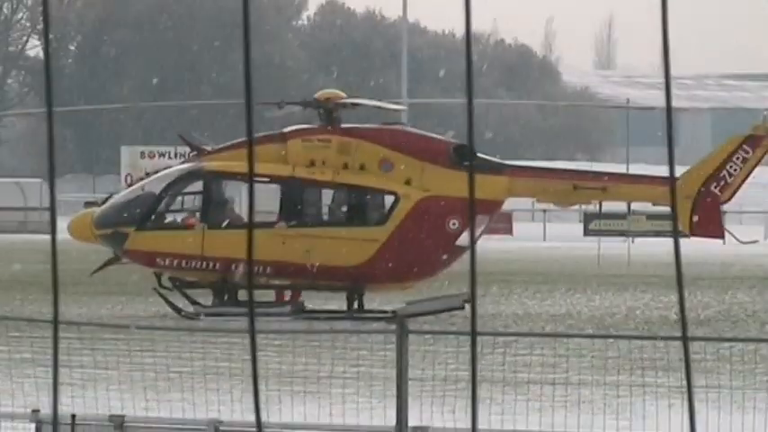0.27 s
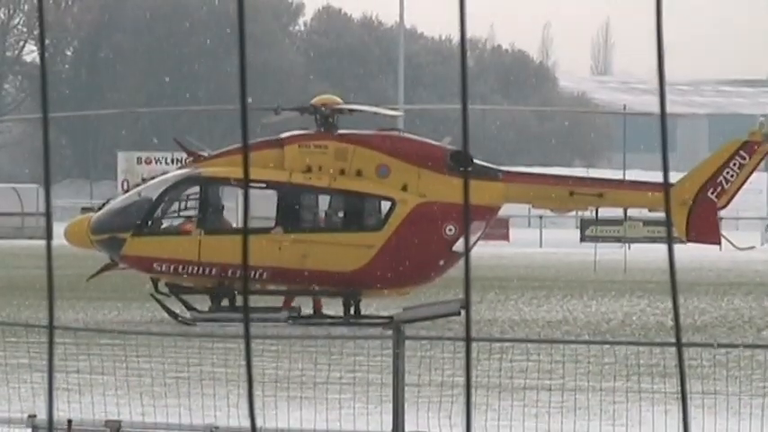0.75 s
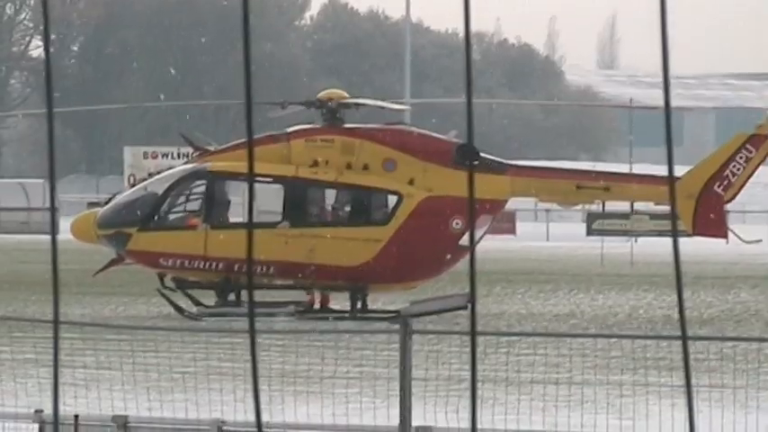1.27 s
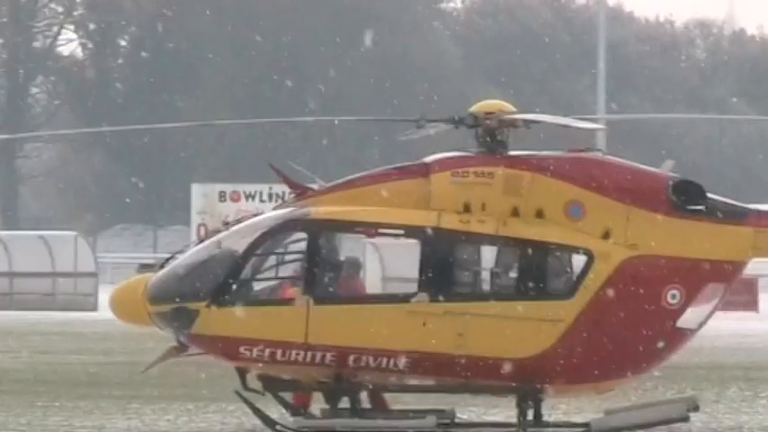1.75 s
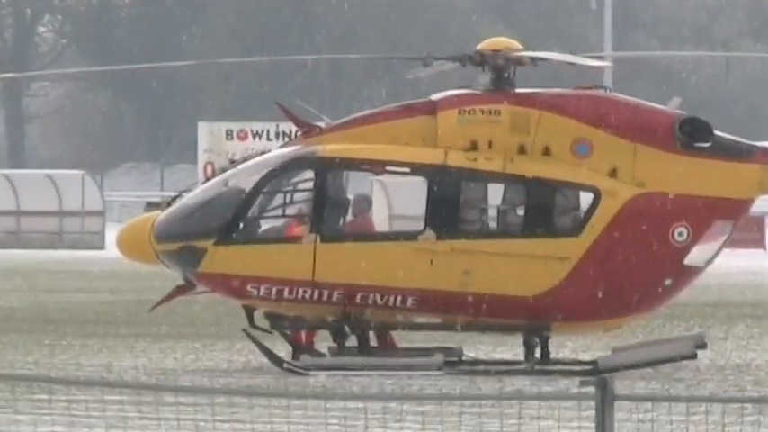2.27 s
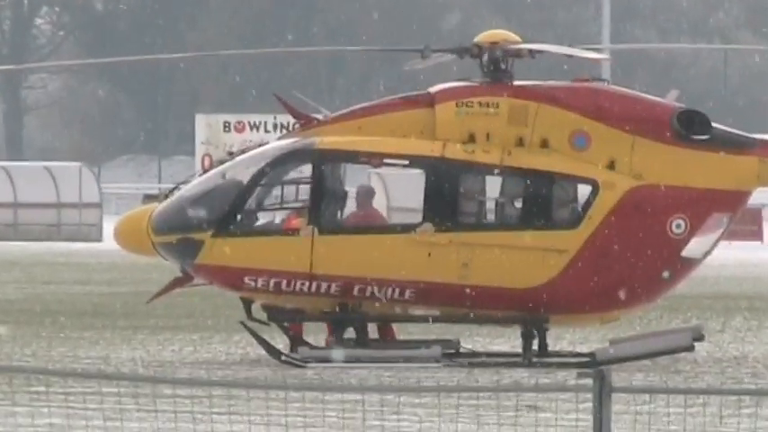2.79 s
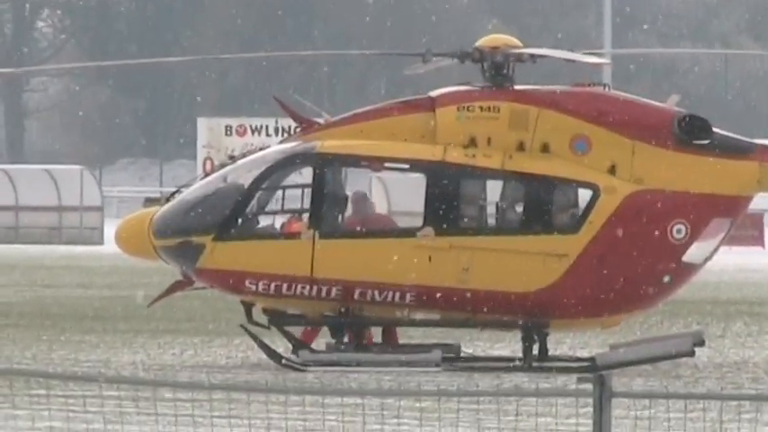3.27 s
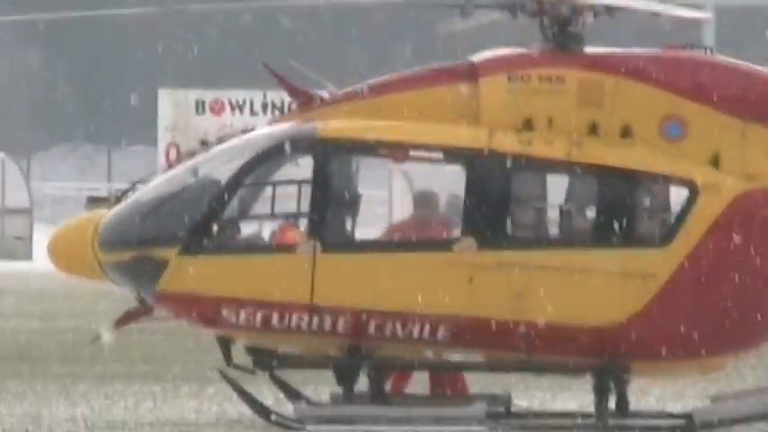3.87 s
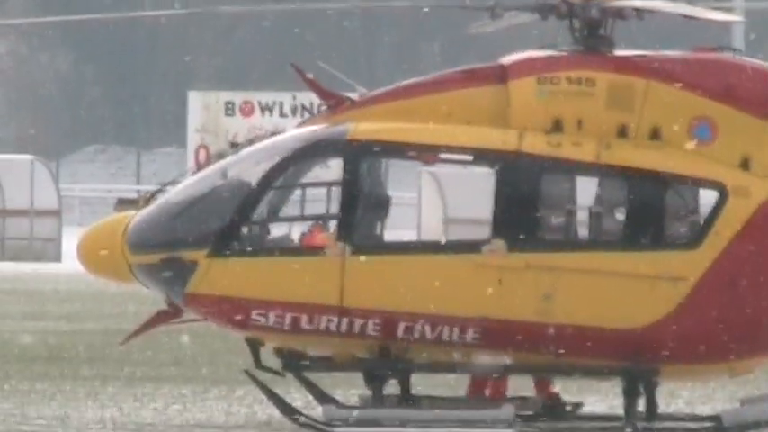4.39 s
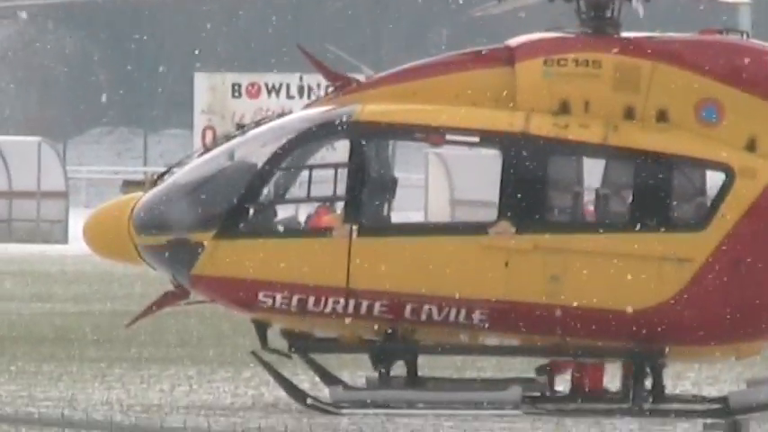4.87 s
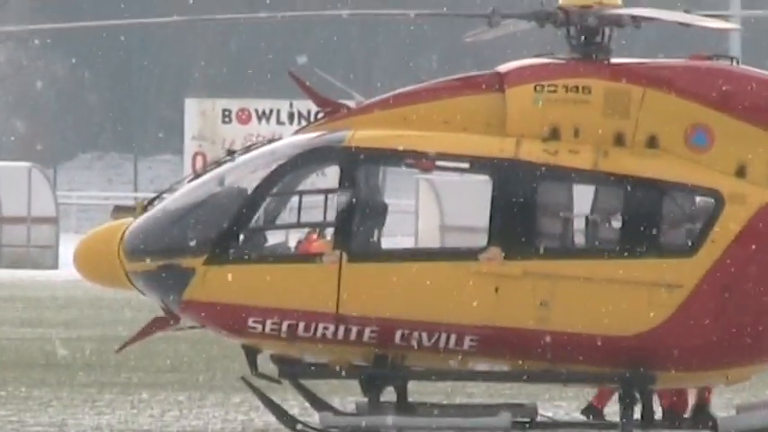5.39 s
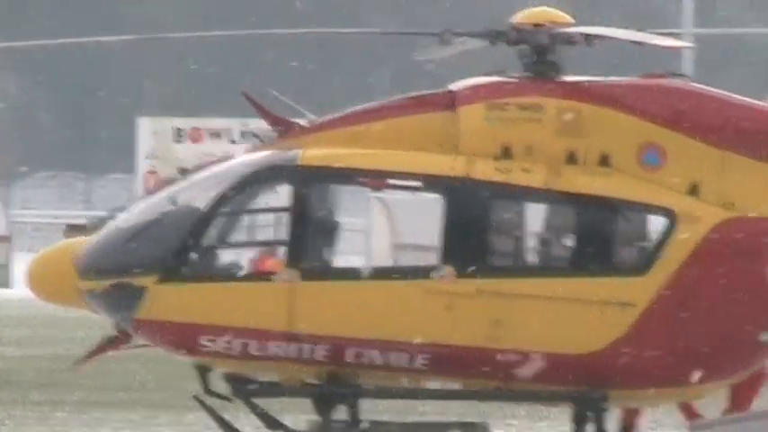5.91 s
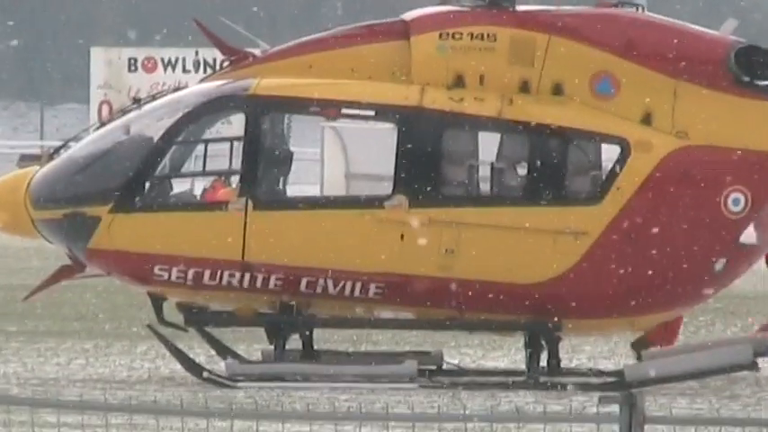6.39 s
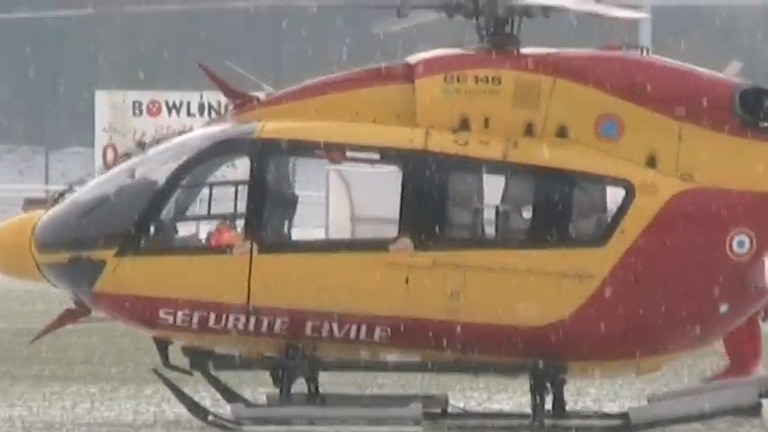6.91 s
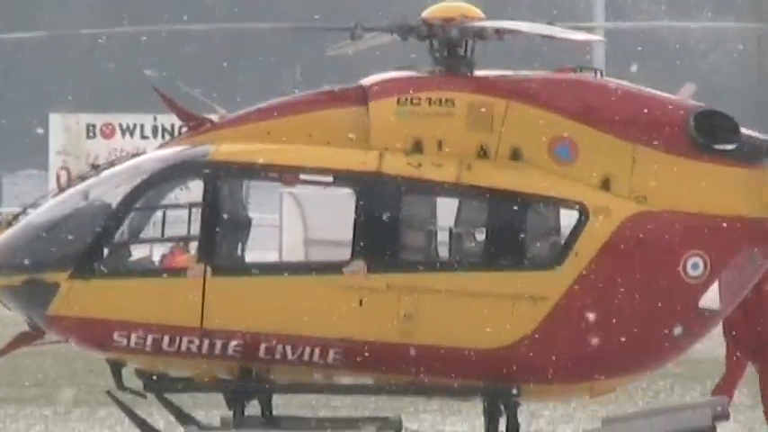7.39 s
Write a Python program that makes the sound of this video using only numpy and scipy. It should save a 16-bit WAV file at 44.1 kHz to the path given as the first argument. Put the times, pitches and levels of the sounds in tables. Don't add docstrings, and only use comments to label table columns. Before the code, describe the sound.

Close turbine noise from a standing helicopter: dense high whines, rushing hiss and a swelling low drone. A sharp cut then drops the drone, leaving steady hiss, low hum and a hard whine that waxes and wanes, with a fine motor buzz from the camera. Wind puffs bump the microphone, strongest near six seconds, and fingers click on its housing. Open field, handheld stereo.

```python
import sys
import numpy as np
from scipy import signal
from scipy.fft import rfft, irfft, next_fast_len
from scipy.io import wavfile
from scipy.ndimage import uniform_filter1d

SR = 44100
rng = np.random.default_rng(int(sys.argv[2]) if len(sys.argv) > 2 else 0)


def dump(signal):
    limited = np.clip(np.atleast_2d(signal).T, -1, 1)
    pcm = np.round(limited * 32767).astype(np.int16)
    wavfile.write(sys.argv[1], SR, pcm)


def invert_db(x):
    u = np.asarray(x, float) / 20
    return 10 ** u


N = 337365
JUMP_S = 1.7425


def walk(rate, n):
    knots = uniform_filter1d(rng.standard_normal(int(n / SR * rate * 4) + 8), size=4) * 2
    return np.interp(np.linspace(0, len(knots) - 1, n), np.arange(len(knots)), knots)


def column(table, k, hz):
    rows = np.array(table)
    return np.interp(np.log(hz), np.log(rows[:, 0]), rows[:, k])


def curve(table, t):
    s, db = np.transpose(table)
    return np.interp(t, s, db)


def tone(phase, db, right_db, lead, sway_db, rate):
    gain = np.sqrt(2) * invert_db(db + sway_db * walk(rate, len(phase)))
    left = np.cos(phase)
    right = invert_db(right_db) * np.cos(phase + lead)
    return gain * np.array([left, right])


def thicket(hz, lines, width_hz, trim_db):
    gain = np.ones(len(hz))
    for centre, over_db in lines:
        near = slice(*np.searchsorted(hz, [centre - 40, centre + 40]))
        shape = 1 / (1 + ((hz[near] - centre) / width_hz) ** 2)
        gain[near] += invert_db(min(over_db, 17) + trim_db) * shape
    return gain


# frequency in Hz, left level in dB per Hz, right minus left in dB,
# likeness of the ports from 0 to 1, right lead in rad.
HISS_AT_ENGINE = [(28, -77, -3, 1, -3.5), (55, -65, 3, 0.44, -3), (98, -61, 6.5, 0.6, 2.7),
                  (194, -66.5, 3, 0, 2), (347, -68.5, -1, 0.63, -2.1), (1340, -71.5, 0, 0.84, 0.3),
                  (2070, -73, 0.5, 1, -1.1), (3960, -76.5, 6.5, 0.99, 0.37), (5130, -83.5, -1, 0.4, -0.6),
                  (6050, -71, -1, 0.8, 4), (6580, -92, 2, 0, 3), (8900, -84, -0.5, 0.78, 4),
                  (11200, -99, 6.5, 0.66, 3.5), (13900, -114, -4, 0.5, 5)]
HISS_FARTHER = [(28, -73.5, -3, 0.62, -1), (54.6, -69, 1, 0.35, -2), (110, -66.5, 4.5, 0.4, -3),
                (254, -66, -1.5, 0.3, -2), (460, -74, 0, 0.57, 0.85), (2030, -82.5, 0, 0.67, -0.47),
                (2400, -84, -2, 0.32, 0), (3940, -81, -5, 0.35, 1.03), (5540, -74.5, -3, 0.55, 1.21),
                (7040, -81.5, -5, 0.31, 5), (7170, -87, -0.5, 0.48, 3), (8460, -80, -4.5, 0.79, 3.5),
                (10930, -96.5, 2, 0.84, 3.5), (14100, -121, 1.5, 0.04, 3.5)]
# frequency in Hz, width in Hz, gain in dB.
RESONANCES_AT_ENGINE = [(233, 110, 3), (650, 130, 2), (1140, 140, 2.5), (1770, 250, 3.5), (4480, 350, -2.5),
                        (5650, 310, -6), (5750, 320, -9), (4250, 120, -1), (8900, 500, -4),
                        (10000, 560, -6.5), (10900, 230, 7), (11400, 180, 1), (11900, 170, -20),
                        (12300, 600, -15), (14200, 450, 17)]
RESONANCES_FARTHER = [(299, 18, -8), (764, 150, 3), (970, 110, -2.5), (1280, 190, 2.5), (3400, 540, -1.5),
                      (4240, 150, 0), (5050, 120, -2), (6900, 240, 4), (10700, 250, -4), (4940, 230, -4),
                      (5630, 210, -6), (6930, 170, -15), (9400, 200, -1), (9900, 570, -11),
                      (11140, 570, 11), (12000, 140, -5), (12300, 200, -1), (14040, 590, 18.5)]
# frequency in Hz, height over the hiss in dB.
FAINT_AT_ENGINE = [(4459, 13), (4652, 12), (4919, 11), (5000, 9), (5200, 10), (5300, 11), (5365, 14),
                   (5500, 10), (5600, 11), (5745, 18), (5909, 11), (6163, 11), (6357, 13), (6395, 13),
                   (6688, 15), (7057, 9), (7327, 11), (7400, 12), (7546, 12), (7601, 14), (7643, 18),
                   (7699, 14), (8048, 10), (8177, 14), (8272, 13), (8372, 9), (8421, 13), (8592, 12),
                   (8623, 10), (8846, 18), (8959, 12), (9000, 21), (9040, 15), (9097, 11), (9348, 10),
                   (9487, 13), (9566, 15), (9600, 22), (9761, 11), (10000, 10), (10249, 19), (10400, 10),
                   (10499, 11), (10661, 23), (10800, 15), (10828, 13), (10879, 16), (11049, 10),
                   (11123, 13), (11149, 10), (11275, 12), (11368, 10), (11400, 12), (11489, 9), (11509, 16),
                   (11563, 9), (11630, 15), (11782, 14)]
FAINT_FARTHER_LOW = [(2850, 10), (2918, 8), (3019, 10), (3130, 7), (3150, 10), (3451, 9), (3472, 10),
                     (3503, 10), (3577, 13), (4070, 8), (4089, 7), (4269, 8), (4350, 11), (4459, 8),
                     (4600, 7), (4626, 10), (5000, 8), (5041, 7), (5174, 8), (5234, 12), (5467, 8),
                     (5499, 11), (5521, 6), (5550, 8), (5599, 8), (5720, 9), (5814, 12), (5910, 10),
                     (6053, 9), (6206, 12), (6358, 11), (6394, 13), (6450, 9)]
FAINT_FARTHER_HIGH = [(6803, 11), (6841, 12), (6973, 9), (7051, 14), (7101, 8), (7154, 13), (7251, 11),
                      (7327, 10), (7350, 13), (7475, 9), (7559, 14), (7601, 15), (7923, 12), (8049, 9),
                      (8081, 10), (8226, 9), (8272, 9), (8325, 8), (8371, 9), (8422, 10), (8502, 10),
                      (8623, 11), (8666, 13), (9040, 13), (9069, 11), (9128, 11), (9488, 11), (9543, 14),
                      (9567, 13), (9600, 14), (9760, 10), (10050, 9), (10222, 12), (10250, 12), (10350, 8),
                      (10413, 10), (10468, 9), (10500, 9), (10610, 8), (10800, 13), (10829, 10),
                      (11049, 11), (11122, 11), (11149, 14), (11315, 12), (11369, 13), (11400, 10),
                      (11455, 9), (11509, 13), (11563, 12), (11586, 8), (11780, 11), (11827, 9),
                      (12000, 25), (12171, 18), (12244, 11), (12300, 20), (12366, 9)]


def hiss(ports, resonances, n, swell_db, flicker_db, faint, lines_db):
    m = next_fast_len(n)
    hz = np.maximum(np.arange(m // 2 + 1) * SR / m, 1)
    shared, own = rfft(rng.standard_normal((2, m)))
    left = shared * thicket(hz, faint, 1.4, lines_db)

    like = column(ports, 3, hz)
    like = like - 0.15 * np.exp(-((hz - 11330) / 300) ** 2)
    like = np.clip(like, 0, 1)
    right = like * left * np.exp(1j * column(ports, 4, hz)) + np.sqrt(1 - like ** 2) * own
    right = right * invert_db(column(ports, 2, hz))

    db = column(ports, 1, hz)
    for centre, width, gain_db in resonances:
        db = db + gain_db * np.exp(-((hz - centre) / width) ** 2)
    low_cut = np.minimum(hz / 20, 1) ** 2
    both = np.array([left, right]) * invert_db(db) * np.sqrt(SR / 2) * low_cut

    octave = np.log2(np.clip(hz, 30, 30 * 2 ** 9) / 30)
    bands = []
    for k in range(10):
        share = np.clip(1 - abs(octave - k), 0, 1)
        band = irfft(both * share, m)[:, :n]
        bands.append(band * invert_db(swell_db * walk(0.7, n) + flicker_db * walk(9, n)))
    return bands


# frequency in Hz, left level in dB, right minus left in dB, right lead in rad.
HUM_AT_ENGINE = [(77.7, -41.5, -4.5, -0.73)]
HUM_FARTHER = [(74.9, -40, 1.5, -1.02), (147.8, -59, -1.5, -0.58), (209.3, -53.5, -5, -0.016),
               (244.5, -55, -6, 0.049)]


def hums(t, rows):
    return sum(tone(2 * np.pi * hz * t, db, r_db, lead, 0.41, 6) for hz, db, r_db, lead in rows)


# multiple of the drone frequency, level relative to the drone in dB.
DRONE_OVERTONES = [(1, 1), (1.5, -20), (2, -20), (2.5, -22), (3, -51)]


def drone(hz, db):
    phase = 2 * np.pi * np.cumsum(hz) / SR
    out = 0
    for k, over_db in DRONE_OVERTONES:
        sway_db = 0.6 if over_db > -6 else 4.0
        out = out + tone(k * phase, db + over_db, 0.73, -0.71, sway_db, 12)
    return out


# frequency in Hz, level over the main whine in dB
SHAFT_FAMILY = [
    (3821.8, 0, 0, 1),
    (3724.8, -12, -12, 1),
    (5623.1, -14, -4, .7),
]
# frequency in Hz, left level in dB, right minus left in dB.
WHINES_AT_ENGINE = [(3018.1, -57, 4), (3130.3, -58, 4), (3505.1, -56, 5), (3577.5, -61, 7),
                    (4024.2, -55, 4), (4049.9, -50, 5), (4599.7, -60, 3), (4625.5, -61, 5),
                    (4722.4, -57, -3), (4941.8, -59, -2), (5257.6, -61, 0), (5719.5, -57, -5),
                    (5814.4, -55, -11), (5939.7, -55, -5), (6061.7, -58, -4), (6207.0, -58, -2),
                    (6260.3, -56, -3), (6426.7, -54, -1), (6523.4, -57, -2), (6707.2, -60, 0),
                    (6743.0, -61, 1), (6839.8, -60, 1), (7951.6, -63, -1), (8146.0, -58, -1),
                    (8447.2, -56, -8), (8666.3, -62, -8), (9541.7, -65, 1), (11342.2, -66, -1)]
WHINES_FARTHER = [(4024.2, -57, -4), (4049.8, -54, -5), (4650.3, -57, -4), (4819.8, -60, -3),
                  (4950.0, -58, -4), (5257.6, -51, -5), (5300.0, -59, -8), (5365.7, -53, -7),
                  (5849.8, -57, -10), (5939.7, -58, -8), (6162.6, -56, -6), (6260.7, -55, -6),
                  (6426.4, -59, -4), (6523.5, -59, -3), (6609.6, -57, -3), (6687.7, -61, -4),
                  (6707.4, -59, -3), (6750.0, -59, -4), (7644.1, -61, -7), (7698.9, -60, -2),
                  (7950.8, -55, -4), (8145.7, -50, -4), (8178.3, -52, -5), (8447.9, -53, -6),
                  (8592.9, -58, -3), (8762.9, -61, -6), (8845.0, -57, -9), (11343.2, -63, 0)]


def whines(t, lines, ports, main_db, spot, right_db):
    out = 0
    swell_db = main_db - main_db.mean()
    for row in SHAFT_FAMILY:
        hz, share = row[0], row[3]
        db = main_db.mean() + row[spot] + share * swell_db
        out = out + tone(2 * np.pi * hz * t, db, right_db if hz < 4000 else 0, column(ports, 4, hz), 0.57, 8)
    for hz, db, r_db in lines:
        drift = np.cumsum(0.6 * walk(6, len(t))) / SR
        phase = 2 * np.pi * (hz * t + drift + rng.random())
        out = out + tone(phase, db, r_db, column(ports, 4, hz), 1.8, 5)
    return out


TICK_HZ, TICK_FADE_DB_S = 300.0, 0.39
BEAT_HZ, BEAT_DIP_S = 3.2, 4.235
# multiple of the tick rate, left level in dB, right minus left in dB.
TICK_AT_ENGINE = [(5, -60, 4), (6, -60, 7), (7, -67, 1), (8, -57, 4), (9, -54, 3), (10, -50, 4),
                  (11, -50, 4), (12, -51, 5), (13, -55, 3), (14, -59, 2), (15, -52, 0), (16, -47.5, -4),
                  (17, -59, 5), (18, -49, -2), (19, -53, -10), (20, -53, -5), (21, -53, -4), (22, -54, -1),
                  (23, -69, -2), (24, -69, 6), (25, -63, -2), (26, -65, -1), (27, -69, -2), (28, -56, -5),
                  (29, -73, 4), (31, -66, 2), (33, -64, 1), (34, -70, 2), (37, -79, -1), (39, -77, 0)]
TICK_FARTHER = [(5, -61, -5), (6, -61, -1), (7, -61, -2), (8, -57, -2), (9, -56, -2), (10, -51, -2),
                (11, -51, -2), (12, -50, -4), (13, -53, -6), (14, -56, -2), (15, -45, -4), (16, -43, -4),
                (17, -44, -5), (18, -39, -5), (19, -51.5, -10), (20, -48, -9), (21, -50, -7), (22, -52, -4),
                (23, -54, -5), (24, -72, 2), (25, -64, -3), (26, -61, -3), (27, -64, -3), (28, -49, -5),
                (29, -71, -2), (31, -72, 1), (33, -69, 0), (34, -71, 0), (37, -69, 1), (39, -74, 0)]


def ticks(t, overtones, ports, beat_db):
    turn = 2 * np.pi * (TICK_HZ * (t - .00115) + 0.0016 * walk(2.97, len(t)))
    out = 0
    for k, db, r_db in overtones:
        late = np.arctan((k - 17) / 2.6) + 0.013 * (k - 14) ** 2
        phase = k * turn - late
        lead = column(ports, 4, k * TICK_HZ)
        out = out + tone(phase, db - TICK_FADE_DB_S * (t - t.mean()), r_db, lead, 0.35, 6)
        if k == 18:
            beat = np.pi + 2 * np.pi * BEAT_HZ * (t - BEAT_DIP_S)
            out = out + tone(phase + beat, beat_db, r_db, lead, 1, 5)
    return out, turn


# start in seconds, peak in dB, ring frequency in Hz,
# right minus left in dB, length in seconds.
HOUSING_KNOCKS = [(.0842, -20, 3900, 3, .004), (.0846, -18, 2100, 4, .003), (.0848, -11.5, 1220, 8, .0024),
                  (.0852, -21, 700, 3, .004), (.0855, -21, 2800, 4, .004), (.0878, -16, 1250, 6, .0016),
                  (.0905, -25, 750, 3, .005), (.0950, -28, 1700, 3, .003), (.6742, -24, 5900, -6, .005),
                  (.6742, -28, 4900, 0, .002), (1.7506, -20, 800, 4, .0036), (1.7503, -26, 520, 2, .003),
                  (1.7512, -30, 1500, 2, .003), (1.7570, -33, 800, 2, .005), (2.4503, -23, 6400, -4, .003),
                  (2.4530, -24, 5450, -4, .006), (2.464, -30, 6400, -4, .003), (3.474, -32, 900, 0, .003),
                  (3.475, -33, 1300, 0, .003), (3.621, -35, 750, 2, .003), (3.6256, -25, 850, 2, .0045),
                  (3.630, -25, 1200, 5, .003), (3.6305, -29, 3700, 0, .003), (3.6305, -31, 4700, 0, .003),
                  (3.626, -32, 550, 2, .005), (3.635, -33, 950, 2, .004), (3.972, -37, 895, -2, .0047),
                  (4.211, -34, 1010, 0, .003)]
# start in seconds, # peak
# in dB, centre frequency in Hz, length in seconds, bandwidth over centre frequency.
FINGER_RUBS = [(.0815, -24, 2000, .003, 1.2), (.6745, -18, 4030, .008, .01), (1.66, -28, 290, .08, .5),
               (1.67, -32, 900, .07, 1.4), (1.7093, -23, 1350, .004, .4), (1.7095, -24, 2100, .006, .4),
               (1.7427, -29, 9500, .00012, 1.4), (5.50, -41, 720, .06, .35), (7.384, -38, 5450, .006, .1),
               (7.395, -38, 4030, .03, .004), (7.43, -39, 4050, .045, .003), (7.42, -45, 3480, .045, .004),
               (7.41, -46, 4260, .05, .003), (7.43, -44, 5170, .05, .004), (7.48, -46, 5180, .045, .004)]


def knocks():
    out, t = np.zeros((2, N)), np.arange(4096) / SR
    rows = [(s, db, hz, length, 0.3, r_db) for s, db, hz, r_db, length in HOUSING_KNOCKS]
    rows += [(*row, 1.5) for row in FINGER_RUBS]
    for s, db, hz, length, width, r_db in rows:
        edges = hz * (1 + min(width, 1.8) * np.array([-.5, .5]))
        band = signal.butter(3, edges, "band", fs=SR, output="sos")
        rattle = signal.sosfilt(band, rng.standard_normal(2 * len(t)))[len(t):]
        ring = rattle / rattle.std() + 1.17 * np.sin(2 * np.pi * hz * t)
        rise = 1 - np.exp(-(t / min(0.0006, length)) ** 2)
        ring = ring * np.exp(-(t / length) ** 2) * rise
        ring = ring / abs(ring).max()
        gain = invert_db(db - 0.4 + np.array([[-r_db], [r_db]]) / 2)
        i = int(s * SR)
        out[:, i:i + len(t)] += gain * [np.roll(ring, shift=3), ring]
    return out


DRONE_HZ, DRONE_WANDER_HZ = 139.6, 0.28
HISS_RISE_DB, HISS_RISE_POWER = 3, 3.7
RUMBLE_RISE_DB, RUMBLE_WANDER_DB, HUM_RISE_DB = 6, 4, 4
# time in seconds, drone level in dB.
ENGINE_LOAD = [(0.0, -36), (0.06, -32), (0.47, -33.5), (0.65, -30), (0.75, -29), (1.06, -30), (1.38, -26),
               (1.6, -27), (1.74, -30.5)]
# time in seconds, level in dB.
WHINE_SWELL_AT_ENGINE = [(0.0, -41.5), (0.15, -43.5), (0.55, -46), (0.95, -44), (1.08, -39.5), (1.4, -37),
                         (1.74, -41.5)]


def first_spot(t):
    n = len(t)
    main_db = curve(WHINE_SWELL_AT_ENGINE, t)
    rise = (t / JUMP_S) ** HISS_RISE_POWER
    rise = rise - rise.mean()
    rumble_db = RUMBLE_RISE_DB * rise + RUMBLE_WANDER_DB * walk(6.5, n)

    bands = hiss(HISS_AT_ENGINE, RESONANCES_AT_ENGINE, n, 0.77, 0.58, FAINT_AT_ENGINE, 2.8)
    air = bands[0] + sum(bands[8:])
    air += sum(bands[1:3]) * invert_db(rumble_db)
    air += sum(bands[3:8]) * invert_db(HISS_RISE_DB * rise)

    hum = hums(t, HUM_AT_ENGINE) * invert_db(HUM_RISE_DB * rise)
    engine = drone(DRONE_HZ + DRONE_WANDER_HZ * walk(5.6, n), curve(ENGINE_LOAD, t))
    whine = whines(t, WHINES_AT_ENGINE, HISS_AT_ENGINE, main_db, spot=1, right_db=5.5)
    tick, _ = ticks(t, TICK_AT_ENGINE, HISS_AT_ENGINE, main_db - 18.5)
    return air + hum + engine + whine + tick


THROB_HZ, CALM_DB = 54.9, -59
GUST_MEAN_DB, WIND_WANDER_DB = 3.5, 0.5
TRAFFIC_PEAK_S, TRAFFIC_SPAN_S, TRAFFIC_DB, TRAFFIC_WANDER_DB = 6.3, 1, 1, 1.0
# peak time in seconds, level over the calm in dB, length in seconds.
WIND_GUSTS = [
    (2.87, 2, .08),
    (3.28, 5, .1),
    (4.4, 3, 0.39),
    (4.75, 3, 0.074),
    (5.02, 7, .15),
    (5.5, 6, .12),
    (6.03, 12, .12),
    (6.8, 4, .2),
    (7.65, 3, .1),
]
# time in seconds, level in dB.
WHINE_SWELL_FARTHER = [(1.75, -45), (2.1, -48), (2.6, -49), (2.95, -62), (3.3, -54), (4.0, -52),
                       (4.15, -45), (4.5, -45.5), (5.1, -54), (5.3, -54), (5.5, -53), (5.9, -52.5),
                       (6.2, -62), (6.6, -56), (6.8, -46), (7.65, -52)]
# time in seconds, level in dB.
BEAT_LEVEL_FARTHER = [(1.75, -43), (2.1, -47), (2.4, -58), (3.9, -60), (4.2, -43), (4.45, -45), (4.85, -49),
                      (5.1, -60), (6.45, -60), (6.75, -42.5), (7.05, -45.5), (7.35, -48), (7.65, -56)]


def second_spot(t):
    n = len(t)
    gust_db = WIND_WANDER_DB * walk(7, n)
    for s, db, length in WIND_GUSTS:
        gust_db = gust_db + db * np.exp(-((t - s) / length) ** 2)
    traffic_db = TRAFFIC_DB * np.exp(-((t - TRAFFIC_PEAK_S) / TRAFFIC_SPAN_S) ** 2)
    traffic_db = traffic_db + TRAFFIC_WANDER_DB * walk(6.1, n)

    whine = whines(t, WHINES_FARTHER, HISS_FARTHER, curve(WHINE_SWELL_FARTHER, t), spot=2, right_db=-2.5)
    tick, turn = ticks(t, TICK_FARTHER, HISS_FARTHER, curve(BEAT_LEVEL_FARTHER, t))

    faint = FAINT_FARTHER_LOW + FAINT_FARTHER_HIGH
    bands = hiss(HISS_FARTHER, RESONANCES_FARTHER, n, 0.5, 0.68, faint, 3.8)
    air = sum(bands[2:4]) + bands[6]
    air += sum(bands[:2]) * invert_db(gust_db - GUST_MEAN_DB)
    air += sum(bands[4:6]) * invert_db(traffic_db - 1.5)
    air += sum(bands[7:]) * (1 + 0.033 * np.cos(turn))

    throb = tone(2 * np.pi * THROB_HZ * t, CALM_DB + gust_db, 1.0, -1.3, 1.3, 3.9)
    return air + hums(t, HUM_FARTHER) + throb + whine + tick


def scene():
    t = np.arange(N) / SR
    spots = np.hstack([first_spot(t[t < JUMP_S]), second_spot(t[t >= JUMP_S])])
    return spots + knocks()


def low_pass(x):
    return signal.sosfilt(signal.butter(12, 15050, fs=SR, output="sos"), x)


def record(dry):
    mix = dry + 0.0013
    return low_pass(mix)


dry = scene()
out = record(dry)
dump(out)
```